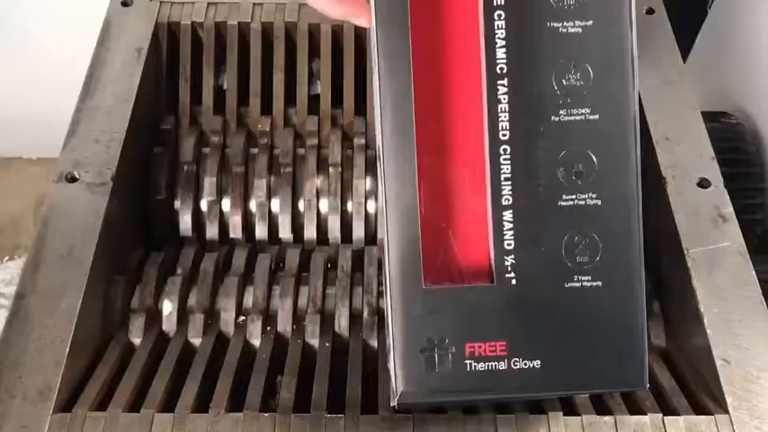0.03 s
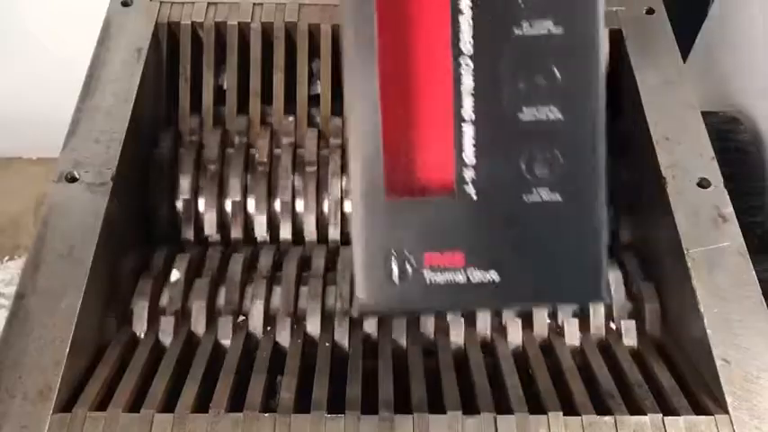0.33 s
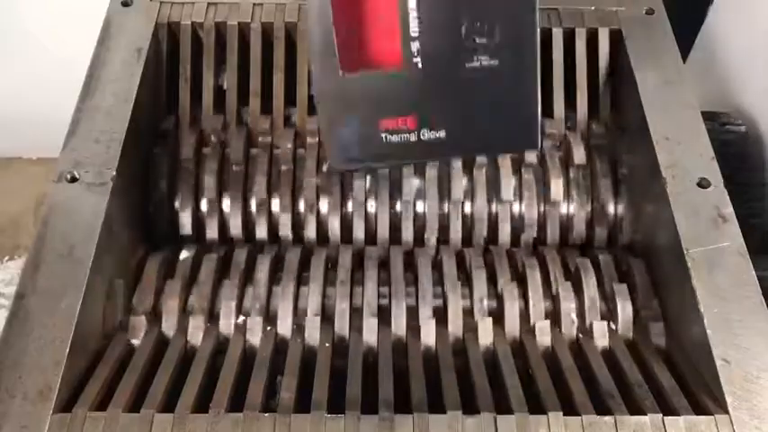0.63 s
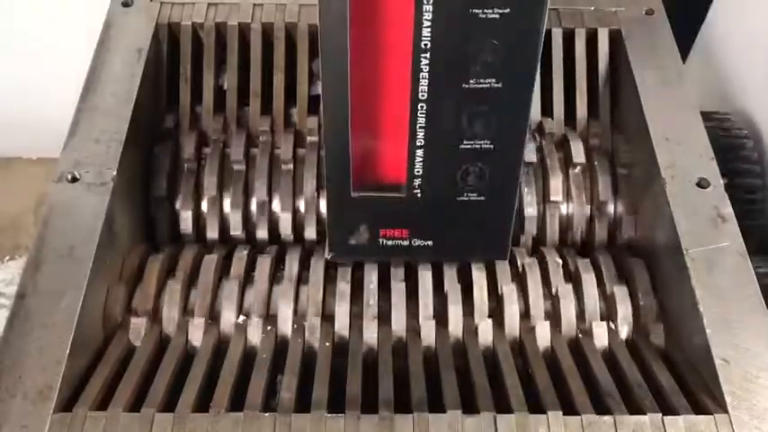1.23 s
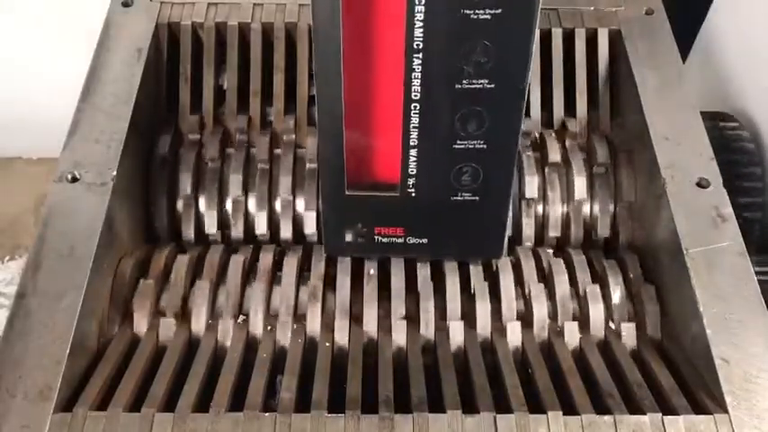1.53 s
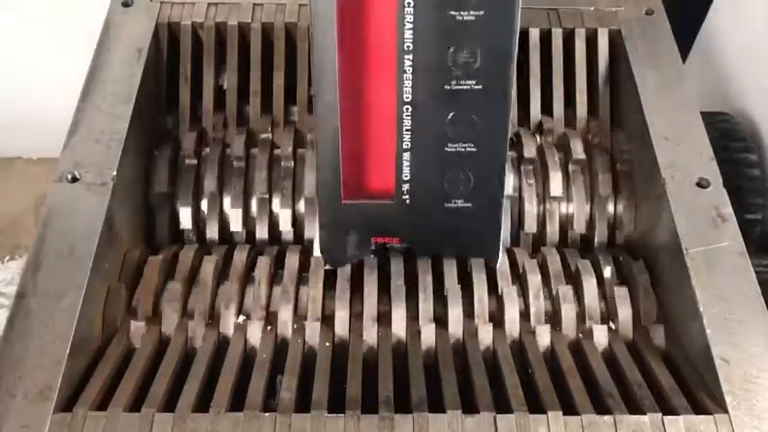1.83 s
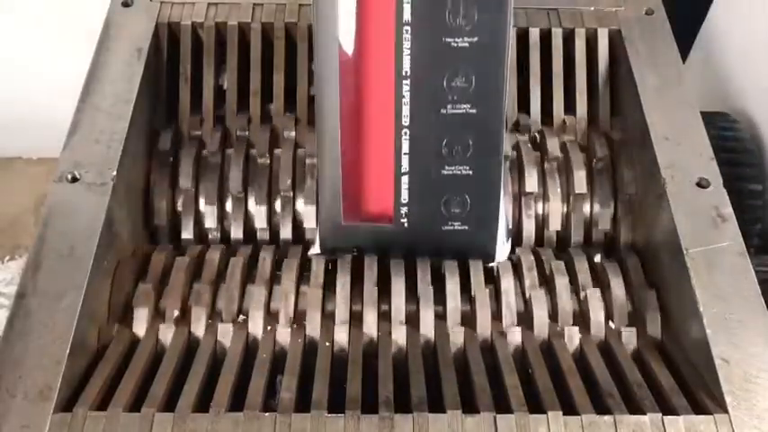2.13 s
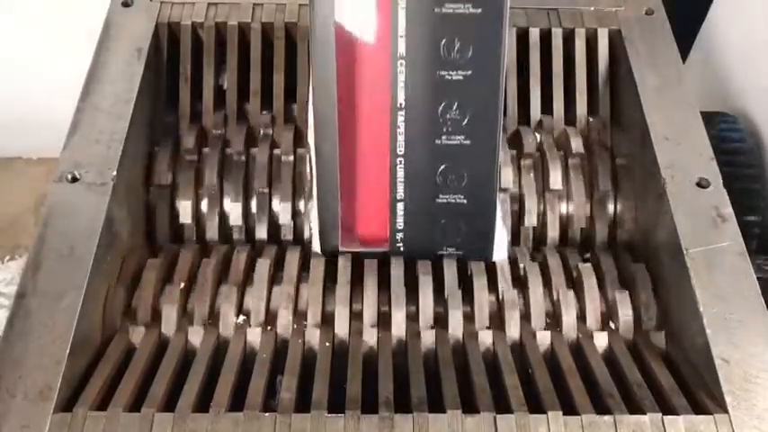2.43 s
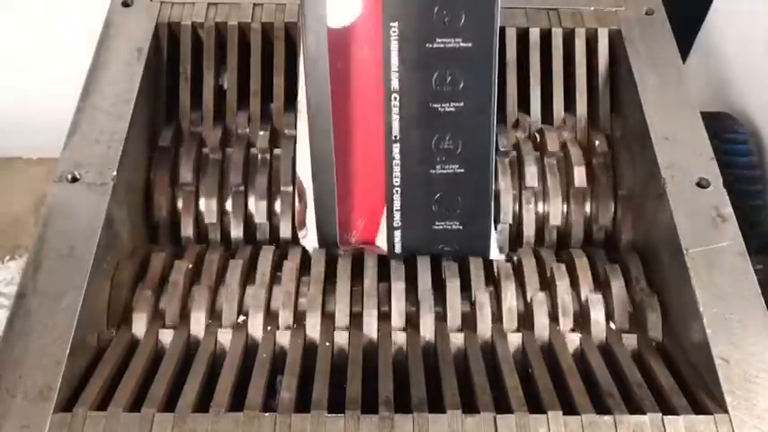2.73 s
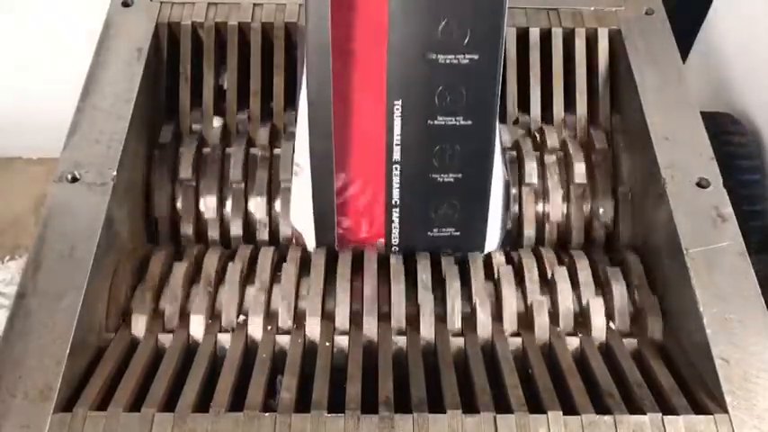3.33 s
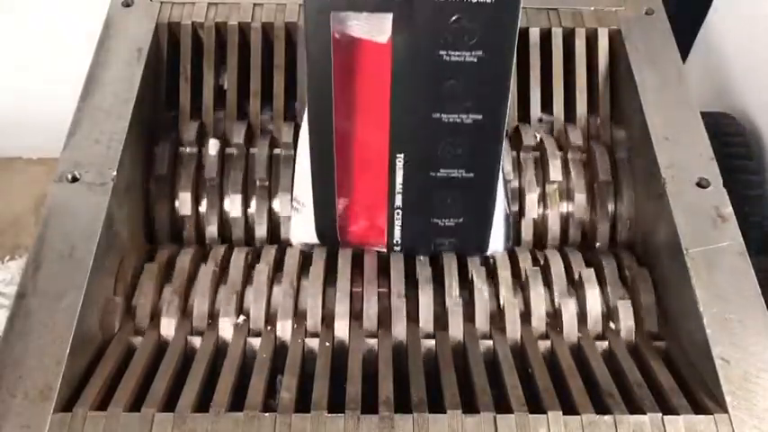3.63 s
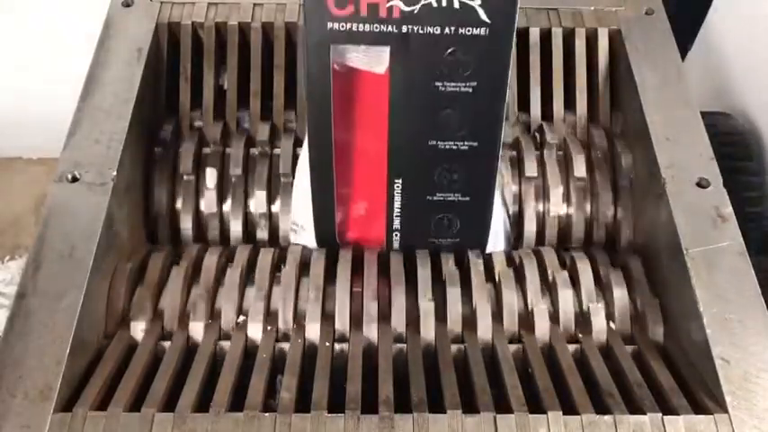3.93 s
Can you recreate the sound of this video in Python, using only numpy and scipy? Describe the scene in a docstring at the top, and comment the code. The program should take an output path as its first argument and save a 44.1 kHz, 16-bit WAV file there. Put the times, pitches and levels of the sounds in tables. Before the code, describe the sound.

An industrial shredder whines and rumbles, then crunches a cardboard box with sharp cracks.

```python
"""A twin-shaft shredder idles, heard close above its steel hopper: the motor drive whines,
the gears rumble and the turning cutters scrape softly. From about 1.5 s they bite a cardboard box.
Its walls crumple, fibres crackle and tear, and folds give way in dry pops and sharp cracks
that echo briefly in the hopper. Near 2 s the gear mesh sings louder under load and the rumble
falls back; from about 3 s the cracks come thick and fast."""
import sys
import numpy as np
from scipy import signal
from scipy.fft import rfft, irfft
from scipy.io import wavfile
from scipy.ndimage import uniform_filter1d

SR = 44100
rng = np.random.default_rng(int(sys.argv[2]) if len(sys.argv) > 2 else 0)


def generate_wav(sig):
    """Save sig (samples, or channels by samples) to the path in sys.argv[1] as 16-bit PCM at SR."""
    pcm = np.round(np.clip(np.atleast_2d(sig).T, -1, 1) * 32767).astype(np.int16)
    wavfile.write(sys.argv[1], SR, pcm)


N = 4 * SR


def undb(db):
    """Decibels to gain."""
    return 10 ** (np.asarray(db) / 20)


def unit(x):
    """Scale to rms 1."""
    return x / np.sqrt(np.mean(x ** 2) + 1e-20)


def clock():
    """Sample times in seconds."""
    return np.arange(N) / SR


def curve(table, column=1):
    """One table column, interpolated linearly in time."""
    rows = np.array(table)
    return np.interp(clock(), rows[:, 0], rows[:, column])


def waver(rate_hz):
    """Smooth random motion at rms 1."""
    hold = int(SR / rate_hz)
    steps = np.repeat(rng.standard_normal(400), hold)[:N]
    return unit(uniform_filter1d(uniform_filter1d(steps, hold), hold))


def colour(x, spectrum):
    """Shape x by (Hz, dB) points, at rms 1."""
    hz, db = np.array(spectrum).T
    bins_hz = np.maximum(np.arange(N // 2 + 1) * SR / N, 1)
    gain = undb(np.interp(np.log(bins_hz), np.log(hz), db))
    return unit(irfft(rfft(x) * gain, N))


def resonate(x, hz, width_hz):
    """A resonance applied twice, for steep skirts."""
    b, a = signal.iirpeak(min(hz, SR / 3), hz / min(width_hz, SR / 4), fs=SR)
    return signal.lfilter(b, a, signal.lfilter(b, a, x))


def pass_filter(x, kind, hz, order=2):
    """Low-pass or high-pass x."""
    return signal.sosfilt(signal.butter(order, hz, kind, fs=SR, output="sos"), x)


def grains(per_s, spread_db):
    """Dense random clicks, most small and a few large."""
    size = undb(spread_db * np.minimum(rng.exponential(size=N), 5))
    return (rng.random(N) < per_s / SR) * size * rng.choice([-1, 1], N)


def add(out, start_s, x):
    """Mix x into out from start_s on."""
    i = int(start_s * SR)
    out[i:i + len(x)] += x[:N - i]


def stick_slip(table, relative_width):
    """Bursts of friction clicks in a broad resonance; each swells fast and dies away."""
    out, clicks, t = np.zeros(N), grains(per_s=9800, spread_db=0.8), clock()
    for start_s, length_s, db, hz in table:
        span = slice(int(start_s * SR), int((start_s + 2 * length_s) * SR))
        age = np.maximum(t[span] - start_s, 0) / length_s * np.pi
        envelope = (age * np.exp(1 - age)) ** 2
        out[span] += undb(db) * envelope * unit(resonate(clicks[span], hz, relative_width * hz))
    return out


def flex(t, hz, cycles):
    """A heavily damped swing whose envelope peaks after the given cycles."""
    age = t * hz / cycles
    return age * np.exp(1 - age) * np.sin(2 * np.pi * hz * t)


# Drive hiss. Each row: frequency in Hz, relative density in dB.
DRIVE_HISS = [(1500, 0), (2800, -6), (3450, -1), (3800, 11), (4050, 7), (4350, 8.5), (5100, -12),
              (7400, -9), (7750, 0), (8250, 0), (8600, -7.5), (10500, -27), (11600, -30), (12000, -12),
              (12600, -29), (15000, -53)]
# Drive tones. Each row: frequency in Hz, level in dB.
DRIVE_TONES = [(3171, -66), (3612, -68.5), (3833, -66.5), (3941.5, -56), (3978.5, -64), (4016, -64),
               (4053.5, -77), (4090, -62), (4199, -69), (4236, -71), (4345, -61.5), (4641, -69),
               (7703, -69), (7957, -73), (7994, -69), (8031, -66.5), (8289, -66), (11936, -93),
               (12010, -74.5), (12231, -91)]


def motor():
    """The drive whines in a skirt of hiss; higher tones flutter more."""
    drive_time_s = np.cumsum(1 + 0.00018 * waver(5.96)) / SR
    out = undb(-56.5) * colour(rng.standard_normal(N), DRIVE_HISS)
    for hz, db in DRIVE_TONES:
        flutter = 1 + 0.22 * hz / 8000 * waver(90)
        amplitude = np.sqrt(2) * undb(db + waver(10)) * flutter
        out += amplitude * np.sin(2 * np.pi * (hz * drive_time_s + rng.random()))
    return out


# Mesh tone. Each row: time in seconds, fundamental in dB, octave in dB.
MESH_LEVELS = [(.1, -60.5, -59.5), (1.4, -59, -62), (1.9, -51.5, -62), (2.2, -48.5, -73), (2.65, -49, -69),
               (3.0, -55, -66), (4.0, -58, -73)]


def gear_mesh(mesh_hz=797):
    """Meshing teeth sing a tone and its octave; the tone grows under load."""
    phase = 2 * np.pi * mesh_hz * np.cumsum(1 + 0.001725 * waver(9.14)) / SR
    fundamental = undb(curve(MESH_LEVELS, 1)) * np.sin(phase)
    octave = undb(curve(MESH_LEVELS, 2)) * np.sin(2 * phase)
    return np.sqrt(2) * (fundamental + octave) * undb(0.5 * waver(10.7))


# Gear rumble. Each row: frequency in Hz, relative density in dB.
RUMBLE_SPECTRUM = [(25, -44), (55, -53), (85, -2), (120, -0.5), (240, 5), (330, 1), (480, 0), (800, -3),
                   (1300, -9), (2300, -13.5), (3200, -22), (4500, -12.5), (9000, -118)]
# Frame resonances. Each row: frequency in Hz, width in Hz, base level in dB.
FRAME_MODES = [(134, 12, -60), (164.2, 18.4, -58), (321, 24, -57), (438.7, 46, -56)]
# Envelope of both. Each row: time in seconds, gain in dB.
RUMBLE_GAIN = [(.1, 2.5), (.3, 0), (.85, -0.5), (1.4, 0.5), (1.75, 3), (1.98, 1.5), (2.06, -3.5),
               (2.8, -9.5), (4.0, -9.5)]


def gear_rumble(tooth_period_s=0.303, peak_at_s=0.35, depth_db=1.5):
    """Gears and frame rumble, swelling as each row of teeth comes round."""
    out = undb(-49) * colour(rng.standard_normal(N), RUMBLE_SPECTRUM)
    for hz, width_hz, db in FRAME_MODES:
        out += undb(db) * unit(resonate(rng.standard_normal(N), hz, width_hz))
    swell_db = depth_db * np.cos(2 * np.pi * (clock() - peak_at_s) / tooth_period_s)
    return out * undb(curve(RUMBLE_GAIN) + swell_db)


# Cutter scrapes. Each row: start in seconds, length in seconds, level in dB, centre in Hz.
CUTTER_SCRAPES = [(.262, 0.044, -47, 930), (.48, 0.014, -49, 2400), (.582, 0.036, -43.5, 980),
                  (.884, 0.027, -41, 2200), (.884, 0.013, -42.5, 900), (1.185, 0.046, -43, 1000),
                  (1.186, 0.028, -46.5, 2270), (1.235, 0.086, -44.5, 575)]


def cutters():
    """Dull scrapes and taps of the turning cutters."""
    return pass_filter(stick_slip(CUTTER_SCRAPES, relative_width=0.81), "low", 3380, order=4)


# Wall, flute and fibre spectra. Each row: frequency in Hz, relative density in dB.
WALL_CRUMPLE = [(30, -8), (100, -23), (220, -11.5), (330, -1.5), (430, -0.5), (620, 1), (820, -3.5),
                (1200, -11), (3000, -37.5)]
FLUTE_CRUNCH = [(300, -13.5), (700, -2.5), (1000, 5.5), (1300, 2.5), (1600, -0.5), (1850, -0.5), (2500, -2),
                (3200, -3.5), (4200, -8), (6000, -12.5), (12000, -36.5)]
FIBRE_CRACKLE = [(1000, -39), (2800, -2), (4800, 1.5), (6800, 1), (8400, 6), (9400, 4.5), (10000, -6.5),
                 (12000, -2.5), (13000, -6.5)]
# Crushing. Each row: time in seconds, crumple in dB, crunch in dB, crackle in dB.
CRUSH_LEVELS = [(1.35, -65, -57.5, -84), (1.45, -47, -50, -62), (1.52, -45.5, -44.5, -58.5),
                (1.63, -46, -42.5, -53.5), (1.79, -46, -44.5, -52), (1.87, -55, -47.5, -51.5),
                (1.93, -47, -47.5, -51), (1.98, -50, -52.5, -52), (2.03, -43, -48, -48.5),
                (2.12, -39.5, -44, -44.5), (2.28, -44.5, -49, -48), (2.45, -49, -48, -49),
                (2.59, -43, -48, -48.5), (2.68, -47.5, -53.5, -54.5), (2.75, -54, -49, -52),
                (2.87, -43.5, -44.5, -44.5), (2.93, -43, -45, -51), (3.0, -47.5, -42, -47),
                (3.07, -43, -44, -46.5), (3.13, -50, -46.5, -53), (3.17, -48, -40, -48),
                (3.24, -45, -48, -50), (3.3, -44.5, -42, -51.5), (3.39, -46.5, -52, -43),
                (3.46, -49.5, -45, -53), (3.54, -43.5, -44, -44.5), (3.66, -46.5, -47.5, -49.5),
                (3.7, -49, -44.5, -47), (3.745, -43.5, -51, -47), (3.8, -46, -40, -42),
                (3.9, -44.5, -42.5, -44.5), (3.95, -54, -42, -52), (4.0, -46, -45, -49)]


def crushing(flicker_db=1.3):
    """Walls crumple, flutes crunch and fibres crackle under one uneven push."""
    crumple = undb(curve(CRUSH_LEVELS, 1)) * colour(grains(per_s=5000, spread_db=4), WALL_CRUMPLE)
    crunch = undb(curve(CRUSH_LEVELS, 2)) * colour(grains(per_s=5000, spread_db=4), FLUTE_CRUNCH)
    crackle = undb(curve(CRUSH_LEVELS, 3)) * colour(grains(per_s=3400, spread_db=3.4), FIBRE_CRACKLE)
    return (crumple + crunch + crackle) * undb(flicker_db * waver(50))


# Rips. Each row: start in seconds, length in seconds, level in dB, centre in Hz.
FIBRE_RIPS = [(1.495, 0.015, -29.5, 626), (1.617, 0.032, -35.5, 480), (1.617, 0.03, -40.5, 1850),
              (2.02, 0.048, -38.5, 1030), (2.096, 0.043, -40.5, 2600), (2.978, 0.036, -41.5, 6500),
              (3.368, 0.072, -36, 1340), (3.488, 0.093, -47, 1430), (3.768, 0.025, -34.5, 770),
              (3.778, 0.034, -32.5, 5170), (3.795, 0.031, -34.5, 2880)]


def rips():
    """Fibres tear in short stick-slip bursts."""
    return stick_slip(FIBRE_RIPS, relative_width=1)


# Folds giving way. Each row: start in seconds, pop gain in dB, pop in Hz, snap gain in dB, snap in Hz.
FOLD_CRACKS = [(1.4986, -23, 637, -32.5, 4600.0), (1.5777, -25.5, 1360, -47, 5500.0),
               (1.6149, -22, 1450, -35, 4880), (1.6355, -31, 700, -26.5, 6200),
               (1.67, -36, 1390, -31, 5900), (1.9545, -23, 1150, -37, 6340),
               (2.011, -14.5, 1050, -27, 5650), (2.0953, -19.5, 1670, -22.5, 4860),
               (2.1594, -17, 1950, -28, 4800.0), (2.16, -3.5, 646, -34, 4100.0),
               (2.163, -15.5, 1570, -47, 4000.0), (2.17, -26.5, 656, -21.5, 7200.0),
               (2.2067, -46, 900, -24.5, 7900.0), (2.2579, -39, 1040, -19.5, 7200),
               (2.272, -31, 1200, -22, 6140), (2.5038, -34, 1410.0, -21, 7800),
               (2.7498, -28.5, 1700, -36, 6650), (2.7708, -38, 2060, -17.5, 5800),
               (2.9088, -18.5, 1230, -18.5, 7900), (2.947, -30.5, 1520.0, -25.0, 7800),
               (2.9544, -29.0, 1900, -18.5, 7700), (2.9635, -39, 1710.0, -20.5, 6360),
               (3.0122, -36, 1400.0, -22, 8500.0), (3.0159, -28.5, 1800, -16, 6800),
               (3.057, -50, 1260.0, -29, 8500), (3.084, -25, 1640, -15.5, 5200),
               (3.1, -44, 1390.0, -26.5, 6100.0), (3.1518, -14.5, 1770, -24, 4130),
               (3.1768, -26.5, 1690, -21, 5650), (3.2153, -6, 1880, -13, 3750),
               (3.27, -24, 1440, -27, 8100.0), (3.2767, -26.5, 1210.0, -25, 7040),
               (3.2935, -27, 1860, -27, 8300), (3.318, -38, 1260, -19.5, 8100),
               (3.339, -21.5, 1250, -39, 6100.0), (3.3691, -22, 1300, -29, 6700.0),
               (3.514, -16, 1170, -20, 7400), (3.5202, -22.5, 1420, -31, 7160),
               (3.5476, -18, 1030, -30, 6300), (3.5975, -26, 1620, -24.5, 7800),
               (3.609, -18, 1330, -40, 6500.0), (3.6207, -18, 1100, -36, 6400.0),
               (3.7349, -21.5, 1260, -18.5, 6600), (3.7601, -14, 910, -41, 5900.0),
               (3.788, -26, 1640, -19.5, 6700), (3.842, -23.5, 1700, -25, 6300.0),
               (3.8556, -21, 1300, -18.5, 5400), (3.8581, -23, 684, -39, 5900.0),
               (3.8863, -24, 1620.0, -24, 7900), (3.9004, -20, 1200, -28.5, 5140),
               (3.9432, -13, 600, -47, 4500.0), (3.9677, -41, 1610.0, -28, 5540)]


def cracks(panel_t60_s=0.016, splinter_decay_s=0.0015, size=4096):
    """A fold buckles: the panel pops and rings briefly, the liner snaps and splinters."""
    out, t = np.zeros(N), np.arange(size) / SR
    for start_s, pop_db, pop_hz, snap_db, snap_hz in FOLD_CRACKS:
        noise = rng.standard_normal((2, size))
        panel = unit(resonate(noise[0], pop_hz, pop_hz)) * undb(-60 * t / panel_t60_s)
        pop = undb(-3.5) * flex(t, pop_hz, cycles=0.67) + undb(-11) * panel
        pop = pass_filter(pop, "high", 0.36 * pop_hz)
        splinters = unit(resonate(noise[1], snap_hz, 1.5 * snap_hz)) * np.exp(-t / splinter_decay_s)
        snap = undb(3) * flex(t, snap_hz, cycles=0.55) + undb(-6.5) * splinters
        add(out, start_s, undb(pop_db) * pop + undb(snap_db) * snap)
    return out


# Box thuds. Each row: start in seconds, level in dB, frequency in Hz.
BOX_THUDS = [(1.499, -27, 445), (1.74, -26, 355), (2.1602, -24.5, 338), (3.548, -32, 427),
             (3.621, -30.5, 560), (3.7613, -25.5, 590), (3.881, -33, 610), (3.9434, -26.5, 380)]


def thuds(size=4096):
    """The whole box swings a few cycles when a tooth jerks it."""
    out, t = np.zeros(N), np.arange(size) / SR
    for start_s, db, hz in BOX_THUDS:
        add(out, start_s, undb(db) * flex(t, hz, cycles=1.11))
    return out


# Box response. Each row: centre in Hz, width in Hz, gain in dB.
BOX_BANDS = [(970, 470, -4.5), (2030, 160, 0), (2500, 460, -1)]


def cardboard():
    """The hollow box colours its own sounds and radiates little bass."""
    box = cracks() + thuds() + crushing() + rips()
    for hz, width_hz, db in BOX_BANDS:
        box += (undb(db) - 1) * resonate(box, hz, width_hz)
    return pass_filter(box, "high", 128)


def hopper_echo(box, t60_s=0.077, gain_db=-9.5, size=16384):
    """The steel hopper returns a short, dense echo."""
    tail = rng.standard_normal(size) * undb(-60 * np.arange(size) / SR / t60_s)
    return undb(gain_db) * signal.fftconvolve(box, tail / np.linalg.norm(tail))[:N]


# Stereo hiss. Each row: frequency in Hz, relative density in dB.
SIDE_HISS = [(4000, -35), (5000, -7), (7400, 7), (7750, 2), (8100, 15), (8400, -10), (11500, -14),
             (12000, -13), (12600, -23)]


def treble_spread(box, above_hz=4200):
    """Side signal: randomly modulated box treble and faint hiss."""
    scatter = unit(pass_filter(rng.standard_normal(N), "low", 360))
    hiss = undb(-70) * colour(rng.standard_normal(N), SIDE_HISS)
    highpass = signal.ellip(8, 0.5, 60, above_hz, "high", fs=SR, output="sos")
    return signal.sosfilt(highpass, undb(-9) * box * scatter + hiss)


def scene():
    """Box and machine sit in the centre; only the treble spreads left and right."""
    box = cardboard()
    mid = box + hopper_echo(box) + motor() + gear_mesh() + gear_rumble() + cutters()
    side = treble_spread(box)
    return np.array([mid + side, mid - side])


def record(dry):
    """The sound starts after a moment of silence; the top is cut."""
    start_s, fade_s, top_hz = 0.07, 0.0011, 13150
    fade_in = np.clip((clock() - start_s) / fade_s, 0, 1)
    return signal.sosfilt(signal.ellip(8, 0.2, 70, top_hz, fs=SR, output="sos"), dry * fade_in)


dry = scene()
out = record(dry)
generate_wav(out)
```